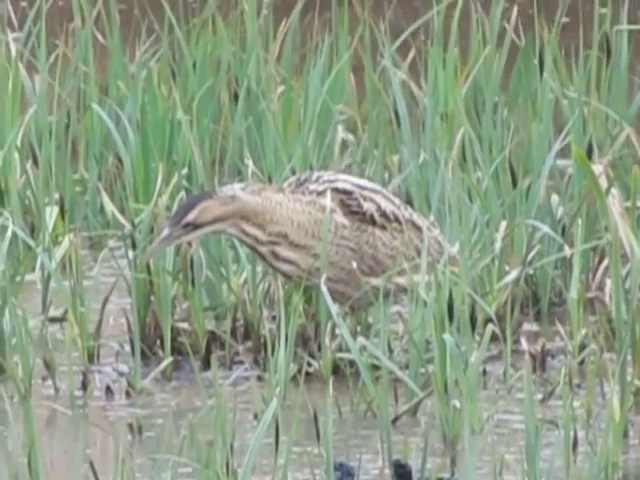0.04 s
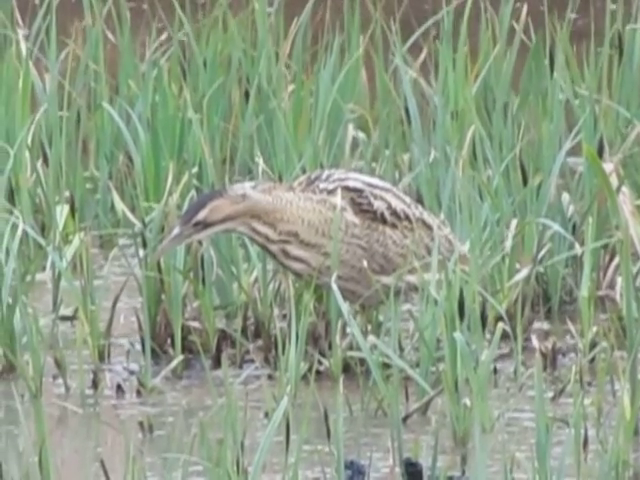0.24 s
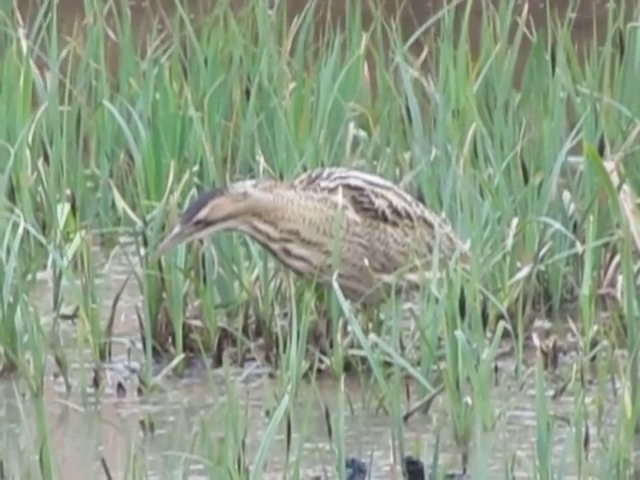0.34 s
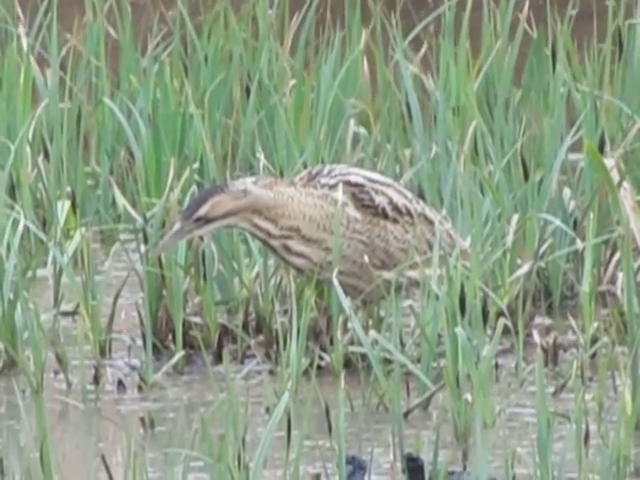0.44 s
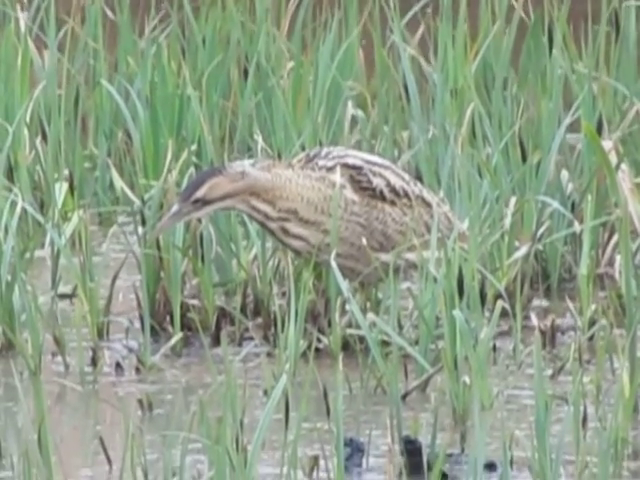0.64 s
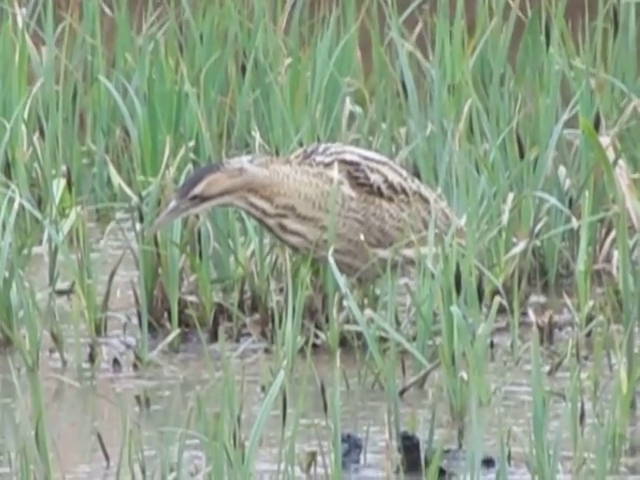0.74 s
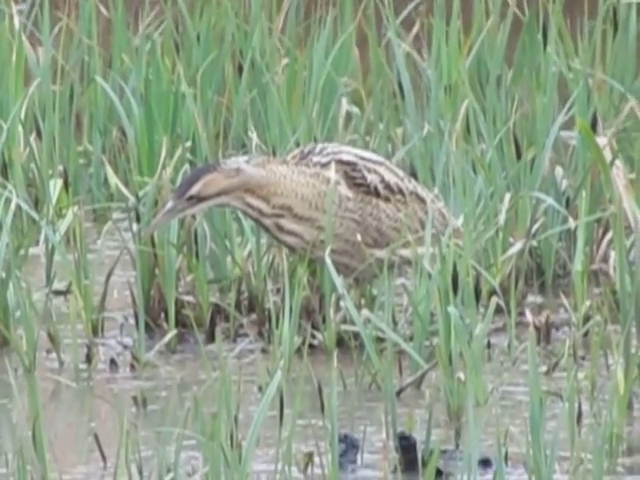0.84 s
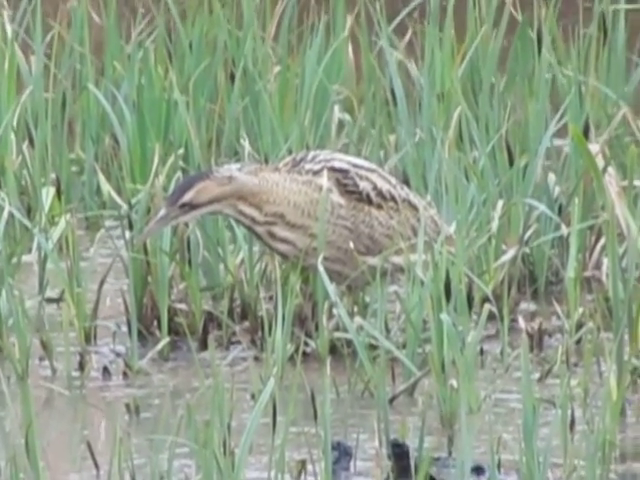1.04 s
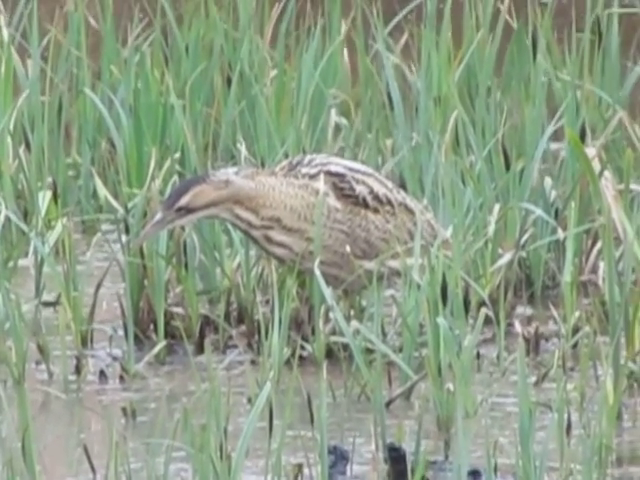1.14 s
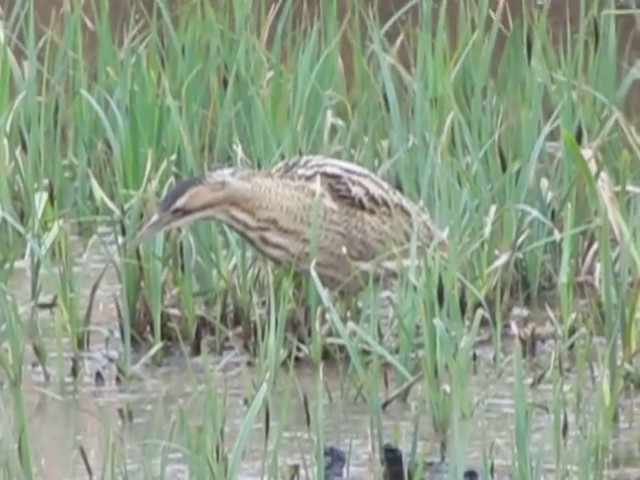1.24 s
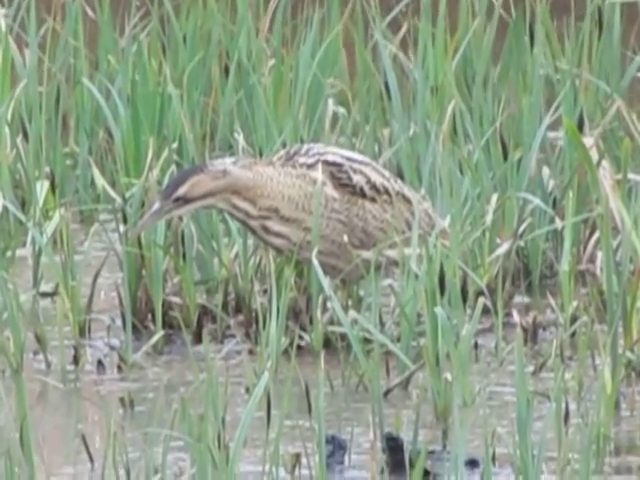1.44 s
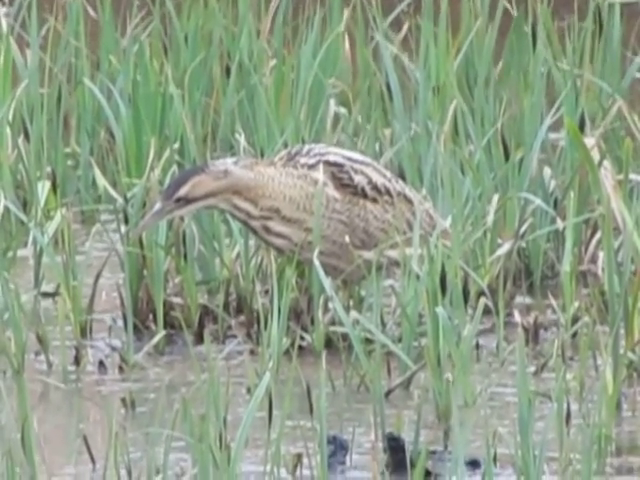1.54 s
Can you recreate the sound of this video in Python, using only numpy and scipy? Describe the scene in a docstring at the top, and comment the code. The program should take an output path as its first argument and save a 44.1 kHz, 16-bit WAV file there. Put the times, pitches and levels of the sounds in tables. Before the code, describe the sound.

A camera shutter fires once, sharp and close to the microphone, with a brief echo in a small wooden shelter. A faint tick, soft bumps on wood and a short scuff follow over a low outdoor rumble and hiss.

```python
"""In a small wooden shelter beside a reed bed, a reflex camera fires once, close by.
Its mirror, shutter blades and levers strike within a tenth of a second, over the whirr of the
cocking gear, and make the camera body ring. A faint tick, soft bumps on wood and a short scuff
follow. Outside there is a low rumble, and a hiss that swells and sinks."""
import sys
import numpy as np
from scipy import signal
from scipy.fft import rfft, irfft
from scipy.io import wavfile
from scipy.ndimage import uniform_filter1d

SR = 44100
rng = np.random.default_rng(int(sys.argv[2]) if len(sys.argv) > 2 else 0)


def file_out(sig):
    """Save sig as 16-bit WAV at sys.argv[1]."""
    # one column per channel
    cols = np.atleast_2d(sig).T
    # limit, then scale
    lim = np.clip(cols, -1, 1)
    pcm = np.round(lim * 32767).astype(np.int16)
    wavfile.write(sys.argv[1], SR, pcm)


N = 70560

# tone of a hit on the camera: pitch_hz, level_db
CAMERA_TONE = [(250, -42), (480, -3.5), (900, -5), (1300, 0), (2600, 0), (3700, -0.5), (5000, 2.5),
               (7800, -4.5), (9400, -2), (12500, -4.5), (15500, -32)]
# stereo width of near sounds and of surrounding ones: pitch_hz, side_minus_middle_db
NEAR_WIDTH = [(700, -17.5), (2400, -5), (4400, -5.5), (9000, -1)]
AIR_WIDTH = [(200, -12), (1300, -6), (2400, -3.5), (9000, 0.5)]


def shutter():
    """Levers strike and ring over the whirring gear, then the mirror falls back and rings the body."""
    # hits of the moving parts: start_s, level_db, extra_bass_db, extra_treble_db
    hits = [(0.198, -11, -5, -3), (0.2005, 2.3, -5, 0.5), (0.2061, 1.5, -8, -3), (0.2177, -3, -2.5, -7),
            (0.22, -0.5, -10, -1.5), (0.2249, -1, -4, -2), (0.2316, -6, 5, 5), (0.235, -3.5, -4, 7),
            (0.2414, -0.5, 0.5, 1), (0.2592, -9, 8.5, 6), (0.2678, -6, -2, 6.5), (0.2704, 0, -3, 0),
            (0.2741, 2, -5, 3.5), (0.2806, -2.5, -7, -8), (0.286, -3, -7, -8)]
    # ringing notes of the levers and the body: pitch_hz, level_db, fade_s
    lever_notes = [(1230, -1.5, 0.011), (2500, -5.5, 0.01), (4750, -7, 0.023), (5260, -4, 0.015),
                   (6250, -1, 0.016)]
    body_notes = [(1850, 8, .02), (2300, 9, .014), (2920, 7, .02), (3220, 5, .02), (4290, 8, .022),
                  (4385, 6, .022), (5500, 1.5, .01), (6300, 4, .02), (7130, 6, .014), (7570, 6, .018),
                  (9180, 3, .02), (9595, 5.5, .02)]
    # lean to one side: pitch_hz, left_minus_right_db
    balance = [(700, -0.5), (2200, -3), (4400, 0)]
    attack_s, mirror_return_s = .0004, .266
    t, levers, mirror = times(), 0, 0
    for start, db, bass_db, treble_db in hits:
        rattle = burst(start, attack_s, fade_s=.034)
        crack = undb(-5) * burst(start, attack_s, fade_s=.005)
        hit = shape(undb(db) * noise() * (rattle + crack), bass_and_treble(bass_db, treble_db))
        if start < mirror_return_s:
            levers = levers + hit
        else:
            mirror = mirror + hit
    gear = unit(noise() * undb(-1.5 * wander(900))) * (t > .2) * (t < .286)
    lever_sound = shape(undb(-18.5) * levers + undb(-30) * gear, 1 + ring(lever_notes))
    body_sound = shape(undb(-20.7) * mirror, 1 + ring(body_notes))
    click = stereo(*(lever_sound + body_sound), NEAR_WIDTH)
    pan_db = over_hz(balance)
    pan = undb(np.array([pan_db, -pan_db]) / 2)
    return shape(click, tone(CAMERA_TONE) * pan)


def bumps():
    """Wood bumps and groans softly: each time a dull thud and one unsteady low note."""
    # bumps on wood: start_s, level_db, pitch_hz, hold_s, thud_minus_note_db
    knocks = [(0.174, -43.5, 277, 0.0076, -2.5), (0.595, -44.5, 198, 0.021, 3.5),
              (0.631, -34.5, 118.7, 0.035, -10), (.688, -38.5, 113.7, 0.017, -5.5),
              (1.418, -41, 158, .105, -12), (1.546, -42.5, 543, 0.0029, -17)]
    # tone of a thud: pitch_hz, level_db
    thud_tone = [(30, -2.5), (250, -3), (450, -11), (1000, -14), (6000, -57)]
    notes, thuds = 0, 0
    for start, db, hz, hold, thud_db in knocks:
        swell = undb(db) * burst(start, attack_s=.0098, fade_s=.048, hold_s=hold)
        pitch_hz = hz * (1 + .025 * wander(60))
        cycles = np.cumsum(pitch_hz) / SR
        notes = notes + swell * undb(1.3 * wander(80)) * np.sin(2 * np.pi * cycles)
        thuds = thuds + swell * undb(thud_db)
    return notes + stereo(*shape(noise() * thuds, tone(thud_tone)), AIR_WIDTH)


def scuffs():
    """A dull slide, then a brighter hollow knock that settles, like something shifted on a ledge."""
    # short rubs: start_s, level_db, attack_s, fade_s, treble_limit_hz
    strokes = [(1.318, -49.5, .002, 0.25, 11000), (1.342, -42, 0.012, 0.24, 2900),
               (1.385, -36.3, 0.005, .2, 7500), (1.398, -44.5, .003, 0.33, 6500),
               (1.427, -47.5, 0.0047, 0.5, 6500), (1.47, -45, .006, 0.1, 1400)]
    # tone of the rubbing: pitch_hz, level_db
    rub_tone = [(200, -2), (600, -1), (2900, -1), (5400, -4.5), (7800, -5.5), (11500, -5.5), (15000, -27)]
    # hollow ringing notes: pitch_hz, level_db, fade_s
    hollow_notes = [(1460, 5, 0.022), (1910, 0, .03), (2780, 3, 0.015), (3400, 1, .018), (4520, 5, 0.025),
                    (4800, 7, .025), (6270, 5, 0.008)]
    rubs = 0
    for start, db, attack, fade, top_hz in strokes:
        rub = noise() * undb(db + 2 * wander(400)) * burst(start, attack, fade)
        treble_cut = 1 / np.sqrt(1 + (freqs() / top_hz) ** 6)
        rubs = rubs + shape(rub, treble_cut)
    return stereo(*shape(rubs, tone(rub_tone) * (1 + ring(hollow_notes))), NEAR_WIDTH)


def tick():
    """A light touch makes a small metal part ring."""
    # notes of the metal: pitch_hz, level_db, fade_s
    metal_notes = [(1660, 7, .07), (5790, 21, .11), (6820, 14, .07), (9470, 13, .04), (11000, 11, .02)]
    touch = undb(-41.5) * noise() * burst(.686, attack_s=.003, fade_s=.08)
    return stereo(*shape(touch, tone(CAMERA_TONE) * (1 + ring(metal_notes))), NEAR_WIDTH)


def shelter(sound):
    """Close walls throw back a blur of echoes, in which the treble dies first."""
    # echo in each pitch band: pitch_hz, fade_s, level_db
    bands = [(685, 0.61, -10), (2380, 0.52, -10.5), (5100, 0.42, -9.5), (11300, 0.19, -11.5)]
    echo = 0
    for k, (_, fade, db) in enumerate(bands):
        band_share = over_hz([(row[0], j == k) for j, row in enumerate(bands)])
        decay = burst(0, attack_s=.0085, fade_s=fade)
        echo = echo + undb(db) * shape(noise() * decay / np.linalg.norm(decay), np.sqrt(band_share))
    return signal.fftconvolve(sound, stereo(*echo, AIR_WIDTH), axes=1)[:, :N]


def outdoors():
    """The outdoor air rumbles on, while a hiss and a duller rustle swell and sink."""
    # tone of each sound: pitch_hz, level_db
    air_tone = [(25, -3.5), (55, 4.5), (90, -4), (155, 1.5), (260, -5.5), (400, -13), (700, -12),
                (1300, -27), (2500, -23), (5000, -25.5), (11500, -41), (15500, -39)]
    hiss_tone = [(400, -3.5), (1000, -2.5), (3600, -0.5), (5200, 2), (11500, 0.5), (15500, -16)]
    rustle_tone = [(80, 0), (160, 5), (420, -5.5), (650, -4), (2400, -10.5), (12000, -38)]
    # their rise and fall: time_s, level_db
    hiss_levels = [(0.501, -55), (.56, -48.5), (.74, -48), (.86, -44.5), (1, -47.5), (1.12, -51),
                   (1.26, -52.5)]
    rustle_levels = [(.55, -52), (.62, -48), (1, -49.5), (1.12, -46.5), (1.26, -48.5), (1.48, -47.5)]
    air = shape(noise(), tone(air_tone)) * undb(-48 + 1.5 * wander(11.92))
    for layer_tone, levels in ((hiss_tone, hiss_levels), (rustle_tone, rustle_levels)):
        level_db = np.interp(times(), *np.array(levels).T)
        air = air + shape(noise(), tone(layer_tone)) * undb(level_db + .16 * wander(60))
    return stereo(*air, AIR_WIDTH) * undb([[-.4], [.4]])  # a little louder on the right


def undb(db):
    """Turn decibels into a volume factor."""
    return 10 ** (np.asarray(db) / 20)


def unit(x):
    """Scale to an average power of 1."""
    return x / np.sqrt(np.mean(x ** 2))


def times():
    """The time of every sample, in seconds."""
    return np.arange(N) / SR


def freqs():
    """The pitches, in Hz, at which the filters work."""
    return np.maximum(np.arange(N + 1) * SR / (2 * N), 1)


def over_hz(points):
    """Join (pitch_hz, value) points into a curve, with all octaves equally wide."""
    hz, value = np.array(points, float).T
    return np.interp(np.log(freqs()), np.log(hz), value)


def shape(x, gain):
    """Filter a sound: turn each pitch up or down by its gain."""
    return irfft(rfft(x, 2 * N) * gain)[..., :N]


def tone(points):
    """A filter shaped by (pitch_hz, level_db) points that never sounds ahead of its input."""
    cepstrum = irfft(np.log(unit(undb(over_hz(points)))))
    cepstrum[1:N] *= 2
    cepstrum[N + 1:] = 0
    return np.exp(rfft(cepstrum))


def bass_and_treble(bass_db, treble_db, bass_hz=1690, treble_hz=7100):
    """A filter that turns the bass and the treble up or down."""
    f = freqs()
    return undb(bass_db / (1 + (f / bass_hz) ** 4) + treble_db / (1 + (treble_hz / f) ** 6))


def ring(notes):
    """A filter that rings at each (pitch_hz, level_db, fade_s) note."""
    return sum(undb(db) / (1 + 2j * np.pi * (freqs() - hz) * fade / np.log(1000))
               for hz, db, fade in notes)


def stereo(middle, side, width):
    """Add the side sound to the middle for the left ear, and subtract it for the right."""
    return middle + np.array([[1], [-1]]) * shape(side, undb(over_hz(width)))


def noise():
    """Two unrelated white noises: middle and side."""
    return rng.standard_normal((2, N))


def burst(start_s, attack_s, fade_s, hold_s=0):
    """A volume curve that rises, holds, then drops 60 dB every fade_s."""
    age = times() - start_s
    rise = np.clip(age / attack_s, 0, 1)
    return rise * undb(-60 * np.maximum(age - attack_s - hold_s, 0) / fade_s)


def wander(rate_hz):
    """A random drift of about 1 up or down, turning rate_hz times a second."""
    step = int(SR / rate_hz)
    stairs = np.repeat(rng.standard_normal(N // step + 1), step)
    return unit(uniform_filter1d(stairs, step)[:N])


def scene():
    """The near sounds and their echoes, over the bumps and the outdoor air."""
    near = shutter() + tick() + scuffs()
    return near + shelter(near) + bumps() + outdoors()


def record(dry):
    """Round off the loudest peaks and cut the highest treble."""
    peak_limit, top_hz = .7, 15200
    rounded = peak_limit * np.tanh(dry / peak_limit)
    return signal.sosfilt(signal.ellip(10, .1, 80, top_hz, fs=SR, output="sos"), rounded)


dry = scene()
out = record(dry)
file_out(out)
```